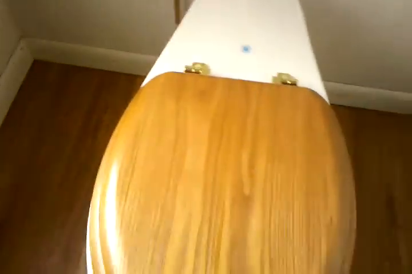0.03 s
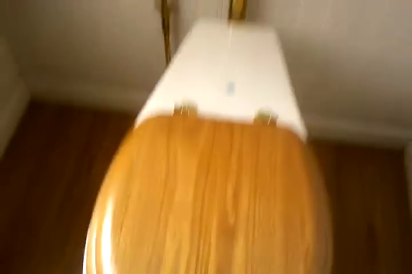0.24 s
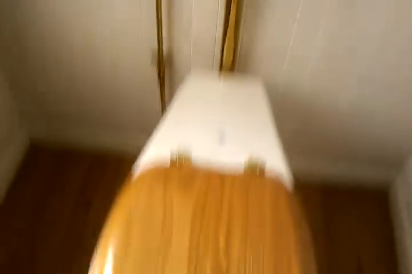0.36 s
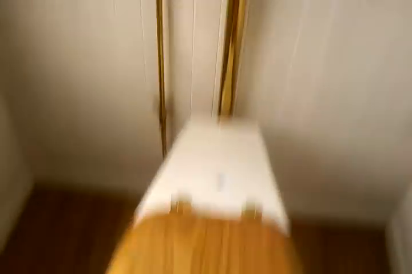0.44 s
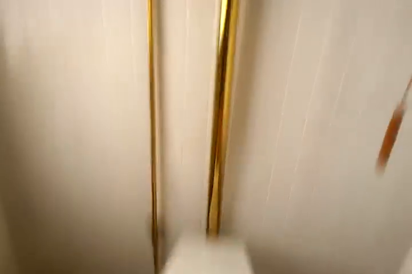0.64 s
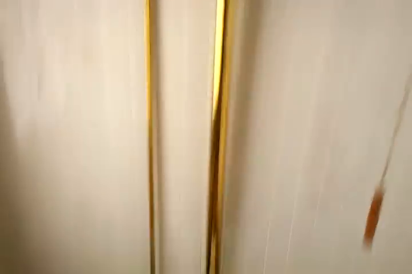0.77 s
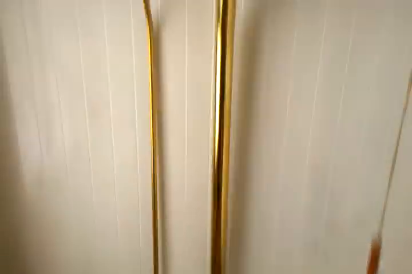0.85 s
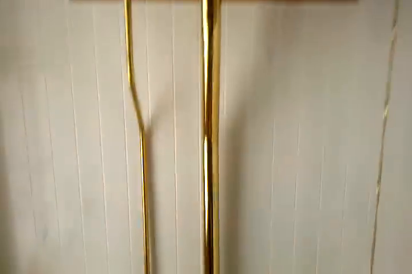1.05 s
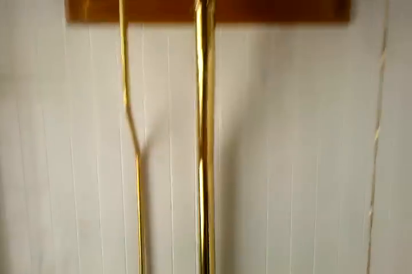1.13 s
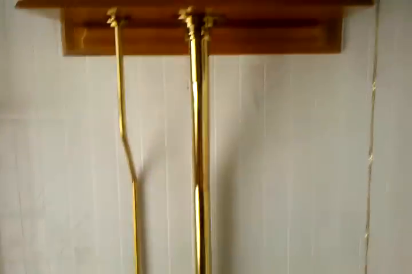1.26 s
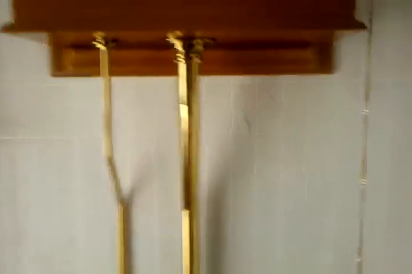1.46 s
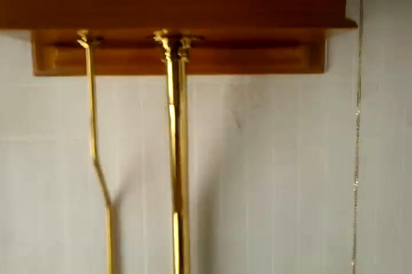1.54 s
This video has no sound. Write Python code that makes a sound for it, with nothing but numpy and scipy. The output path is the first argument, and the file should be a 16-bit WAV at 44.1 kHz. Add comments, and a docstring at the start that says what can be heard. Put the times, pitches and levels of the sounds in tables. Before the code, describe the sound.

A wooden toilet lid drops onto its seat with one sharp knock that rings briefly in a small bathroom. Fingers then rub and tap faintly on the hand-held microphone, with one sharp, close click, over quiet hiss.

```python
"""Toilet lid dropping shut

A wooden lid lands on its seat in a quick clatter, and lid, bowl and small panelled room ring on.
Fingers bump, rub and tap on the hand-held recorder, whose case clicks twice, loudly then faintly.
Low room tone and a quiet hiss lie under it all."""
import sys
import numpy as np
from scipy import signal
from scipy.fft import rfft, irfft
from scipy.io import wavfile

SR = 44100
rng = np.random.default_rng(int(sys.argv[2]) if len(sys.argv) > 2 else 0)


def unload_audio(sound):
    """Save the sound as a 16-bit wav file, at the path given as the first command line argument."""
    columns = np.transpose(np.atleast_2d(sound))
    # keep every value between -1 and 1, then stretch to whole-number steps
    steps = np.round(np.clip(columns, -1, 1) * 32767)
    wavfile.write(sys.argv[1], SR, steps.astype(np.int16))


N = 70560
TIME = np.arange(N) / SR
BIN_HZ = np.arange(N // 2 + 1) * SR / N
LANDING_S = 0.2336


def from_db(db):
    """Decibels to gain."""
    return 10 ** (np.asarray(db) / 20)


def rms_one(x):
    """Scale to rms 1."""
    return x / np.sqrt(np.mean(x ** 2) + 1e-20)


def at_hz(points, hz):
    """Read a curve on a log-frequency axis."""
    freqs, values = np.transpose(points)
    return np.interp(np.log(np.maximum(hz, 1)), np.log(freqs), values)


def noise(colour):
    """Steady noise shaped by an EQ curve, rms 1."""
    white = rfft(rng.standard_normal(N))
    return rms_one(irfft(white * from_db(at_hz(colour, BIN_HZ)), N))


def wander(rate_hz):
    """Smooth random modulation, rms 1."""
    lowpass = signal.butter(2, rate_hz, fs=SR, output="sos")
    return rms_one(signal.sosfilt(lowpass, rng.standard_normal(N)))


def stroke(start, db, attack, hold, t60):
    """Envelope with a linear attack, a hold and an exponential release."""
    release = from_db(-60 * np.maximum(TIME - start - attack - hold, 0) / t60)
    return from_db(db) * np.clip((TIME - start) / attack, 0, 1) * release


def struck(start, attack, t60):
    """Envelope of a hit: a quick swell, then a decay of 60 dB in t60 seconds."""
    age = np.maximum(TIME - start, 0)
    return (1 - np.exp(-age / attack)) * from_db(-60 * age / t60)


def ring(start, hz, attack, t60):
    """One struck mode: a decaying sine."""
    return struck(start, attack, t60) * np.sin(2 * np.pi * hz * (TIME - start))


def body(modes, attack):
    """A body's modes, set ringing by the landing in alternating polarity."""
    return sum((-1) ** (k + 1) * from_db(db) * ring(LANDING_S, hz, attack, t60)
               for k, (hz, db, t60) in enumerate(modes))


# Colours of the room tone and the hiss. Each row: frequency in Hz, relative level in dB.
ROOM_TONE_EQ = [(25, -33), (60, -20), (150, -0.5), (350, -2.5), (600, -8.5), (1500, -17.5), (3000, -16),
                (8000, -21)]
HISS_EQ = [(500, -6.5), (2500, -9), (5000, -9.5), (5800, -1), (6600, 1.5), (7200, -1), (8000, -13)]

def background():
    """A bed of low room tone and a faint, slightly flickering high hiss."""
    room_tone = from_db(-69) * noise(ROOM_TONE_EQ)
    flicker_db = 2.93 * wander(rate_hz=60)
    return room_tone + from_db(-67.5 + flicker_db) * noise(HISS_EQ)


# Colour of skin rubbing the case. Each row: frequency in Hz, relative level in dB.
FRICTION_EQ = [(40, -53), (80, -26), (140, 1), (210, -7), (300, 2.5), (450, -5.5), (600, -9), (740, -2.5),
               (1050, -3.5), (1300, -6.5), (1600, -2.5), (2000, -18.5), (2450, -12.5), (3000, -22.5),
               (5000, -29.5), (8000, -46)]
# Finger strokes. Each row: start in seconds, level in dB, attack, hold and t60 in seconds,
# grip resonance in Hz, its boost in dB.
FINGER_STROKES = [(-0.02, -59.5, 0.012, 0.011, 0.34, 268, 10.5), (0.023, -54, 0.01, 0.0066, 0.22, 1017, 10),
                  (0.089, -58.5, 0.015, .006, 0.32, 1065, 8.5), (0.54, -55, 0.017, 0.12, 0.25, 1000, 2.5),
                  (0.713, -66.5, 0.034, 0.32, 0.9, 1025, 3.5), (1.019, -50, 0.001, 0.0073, 0.37, 1380, 0),
                  (1.183, -54, 0.0048, 0.011, 0.25, 750, 2), (1.233, -62.5, 0.0073, 0.074, 0.27, 750, 7.5)]

def finger_rubs():
    """Fingers bump and slide on the case: grainy friction, coloured by each grip."""
    grip_width_hz, grain_db = 110, 1
    friction = noise(FRICTION_EQ) * from_db(grain_db * wander(rate_hz=50))
    rubs = 0
    for *envelope, hz, boost_db in FINGER_STROKES:
        resonance = signal.lfilter(*signal.iirpeak(hz, hz / grip_width_hz, fs=SR), friction)
        gripped = rms_one(friction + (from_db(boost_db) - 1) * resonance)
        rubs += stroke(*envelope) * gripped
    return rubs


# Taps on the case. Each row: start in seconds, level in dB, pitch in Hz.
FINGER_TAPS = [(0.147, -55, 406), (1.087, -36, 463), (1.424, -52.5, 332), (1.525, -53, 394)]

def finger_taps():
    """Soft fingertips knock out one short, damped note each."""
    return sum(from_db(db) * ring(start, hz, attack=0.0012, t60=0.019) for start, db, hz in FINGER_TAPS)


# The lid's hits on the seat. Each row: start in seconds, level in dB.
LID_HITS = [(0.2335, -35), (0.237, -34.5), (0.2384, -58), (0.241, -34), (0.246, -34)]
# Colour of their crack. Each row: frequency in Hz, relative level in dB.
CRACK_EQ = [(40, -20), (120, -2), (400, -9.5), (800, 7.5), (1500, -6), (3000, -1.5), (5000, -5),
            (6700, 4.5), (8000, -9)]

def lid_clatter():
    """The lid chatters on the seat, each contact a sharp crack of noise."""
    bursts = sum(from_db(db) * struck(start, attack=1 / SR, t60=0.02) for start, db in LID_HITS)
    return bursts * noise(CRACK_EQ)


# Low modes of the seat. Each row: pitch in Hz, level in dB, t60 in seconds.
SEAT_MODES = [(131, -28.5, 0.057), (248, -21.5, 0.043), (403, -20.5, 0.038)]

def seat_thud():
    """The seat takes the landing with a dull, quickly damped thud."""
    return -sum(from_db(db) * ring(LANDING_S, hz, attack=0.0065, t60=t60) for hz, db, t60 in SEAT_MODES)


# Modes of bowl and room. Each row: pitch in Hz, level in dB, t60 in seconds.
BOWL_MODES = [(133.8, -33.5, 0.23), (154.4, -36, 0.23), (196, -24, .32), (222.6, -30.5, 0.26),
              (294.6, -34, 0.32), (354, -39, 0.21), (378, -36, 0.22), (401.8, -31, 0.28),
              (420.7, -30, 0.32), (613, -54.5, 0.52), (708, -49.5, 0.6)]

def bowl_boom():
    """Bowl and room resonate, giving the hit its low boom."""
    return body(BOWL_MODES, attack=0.007)


# Modes of the wooden lid and seat. Each row: pitch in Hz, level in dB, t60 in seconds.
WOOD_MODES = [(779, -45, .2), (1004, -44, .28), (1056, -38, .12), (1162, -32, .19), (1192, -33, .21),
              (1345, -33, .22), (1458, -43, .34), (1853, -41, .18), (2128, -41, .12), (2820, -39, .13),
              (3322, -39, .14), (3739, -36, .11), (4264, -40, .13), (5338, -40, .15), (5780, -42, .14),
              (6043, -39, .12), (6416, -39, .12), (6820, -41, .12)]

def wood_ring():
    """The struck wood rings on brightly above the boom."""
    return body(WOOD_MODES, attack=0.012)


# Colour of the room's tail. Each row: frequency in Hz, relative level in dB.
TAIL_EQ = [(40, -15), (110, -11), (220, -1), (420, -7.5), (620, -6.5), (850, 3), (1500, 0.5), (2200, -7),
           (3000, -4.5), (4700, -11), (6500, -6.5), (8000, -20)]
# Length of the tail. Each row: frequency in Hz, t60 in seconds.
TAIL_DECAY = [(100, 0.57), (500, 0.36), (1400, 0.24), (3000, 0.25), (6500, 0.26)]

def room_tail():
    """The small room answers the knock with dense reverb; each octave dies at its own rate."""
    spectrum = rfft(noise(TAIL_EQ))
    edges_hz = 25 * 2. ** np.arange(10)
    tail = 0
    for low, high in zip(edges_hz, edges_hz[1:]):
        octave = irfft(spectrum * ((BIN_HZ >= low) & (BIN_HZ < high)), N)
        t60 = at_hz(TAIL_DECAY, np.sqrt(low * high))
        tail += octave * struck(LANDING_S, attack=0.0037, t60=t60)
    return from_db(-34) * tail


# Brush strokes. Each row: start in seconds, level in dB, attack, hold and t60 in seconds.
BRUSH_STROKES = [(0.387, -63.5, 0.023, 0.09, 1), (0.524, -57.5, 0.013, 0.0086, 0.16)]
# Their colour. Each row: frequency in Hz, relative level in dB.
BRUSH_EQ = [(500, -2.5), (2000, -3.5), (4000, -5), (6500, -5), (8000, -10.5)]

def brushing():
    """Light, bright friction, like a passing sleeve."""
    return sum(stroke(*row) for row in BRUSH_STROKES) * noise(BRUSH_EQ)


# Snaps of the case; the first two fuse into one click.
# Each row: start in seconds, level in dB, centre pitch in Hz, ring length as a factor.
CASE_SNAPS = [(1.0828, -19, 4400, 0.78), (1.0832, -22, 2440, 1.12), (1.5858, -45.5, 1320, 3.1)]
# Modes of the case. Each row: pitch in Hz, relative level in dB, base t60 in seconds.
CASE_RING = [(1316, -1, 0.01), (2470, -4, 0.0082), (4160, -3, 0.0039), (4690, 2, 0.0048), (6880, -9, 0.013)]

def case_clicks():
    """Dry snaps right at the microphone; each favours the modes near its own pitch."""
    fall_db_per_octave = 13.5
    clicks = 0
    for start, db, centre_hz, length in CASE_SNAPS:
        for hz, mode_db, t60 in CASE_RING:
            gain = from_db(db + mode_db - fall_db_per_octave * abs(np.log2(hz / centre_hz)))
            clicks += gain * ring(start, hz, attack=0.00051, t60=t60 * length)
    return clicks


def scene():
    """Lid hit, handling noise and background, mixed to mono."""
    hit = lid_clatter() + seat_thud() + bowl_boom() + wood_ring() + room_tail()
    handling = finger_rubs() + finger_taps() + brushing() + case_clicks()
    return (hit + handling + background())[None]


def record(dry):
    """A narrow-band recorder: no deep bass; the treble rolls off, then is cut."""
    low_cut_hz, rolloff_hz, cutoff_hz = 87, 6620, 8500
    thin = signal.sosfilt(signal.butter(2, low_cut_hz, "high", fs=SR, output="sos"), dry)
    dull = signal.sosfilt(signal.butter(12, rolloff_hz, fs=SR, output="sos"), thin)
    return signal.sosfilt(signal.cheby2(16, 45, cutoff_hz, fs=SR, output="sos"), dull)


dry = scene()
out = record(dry)
unload_audio(out)
```